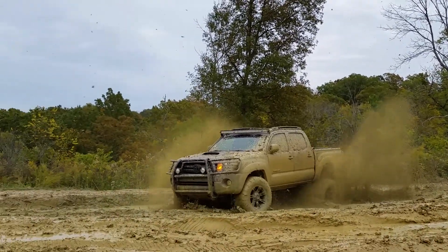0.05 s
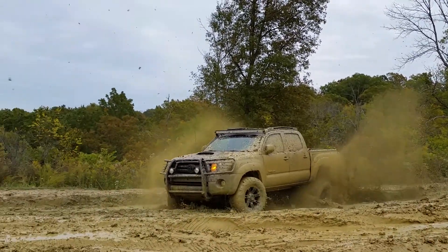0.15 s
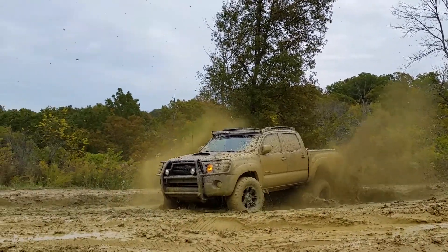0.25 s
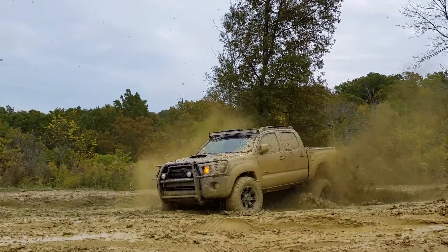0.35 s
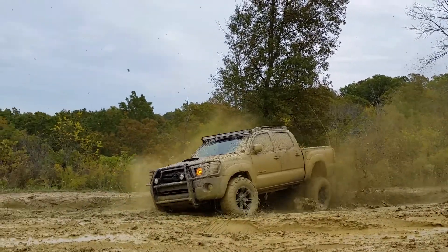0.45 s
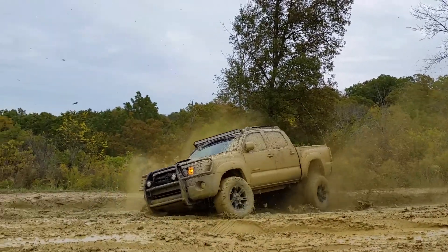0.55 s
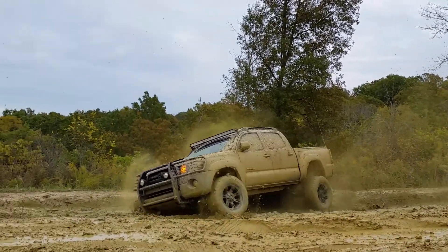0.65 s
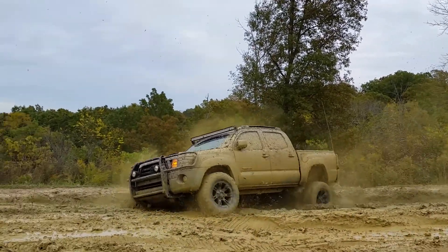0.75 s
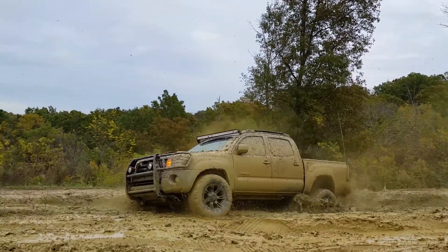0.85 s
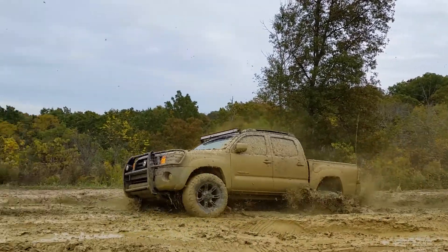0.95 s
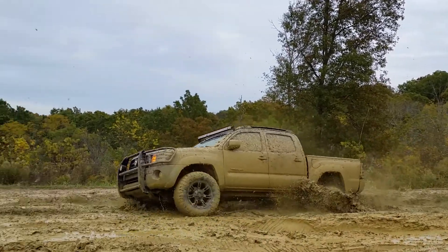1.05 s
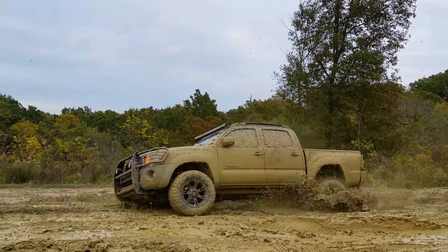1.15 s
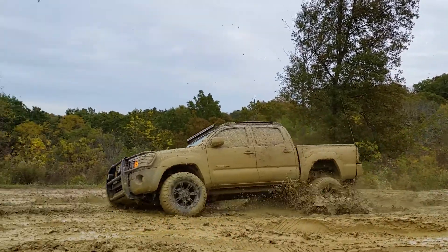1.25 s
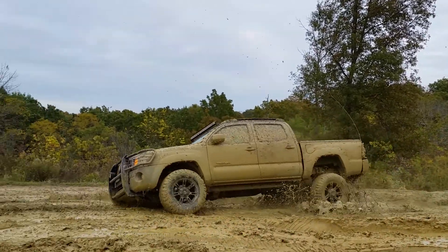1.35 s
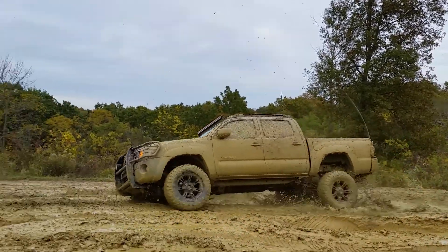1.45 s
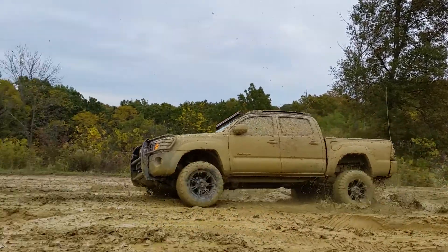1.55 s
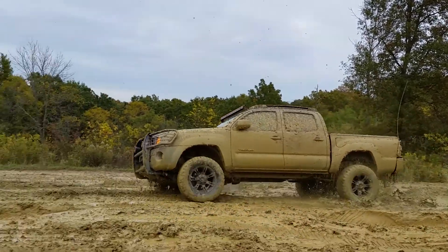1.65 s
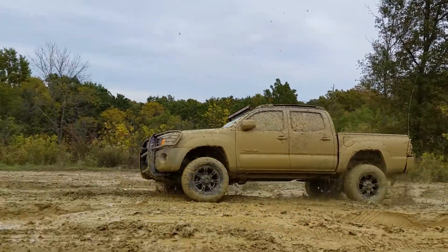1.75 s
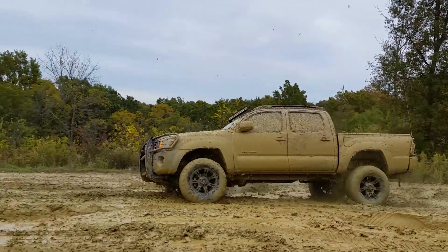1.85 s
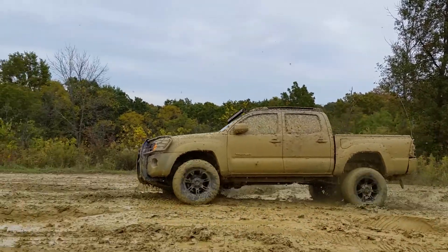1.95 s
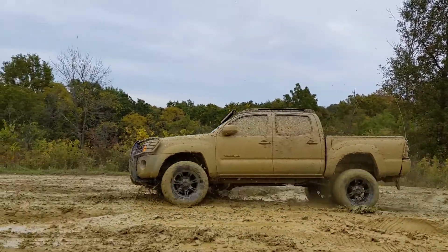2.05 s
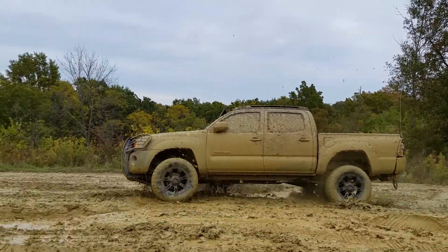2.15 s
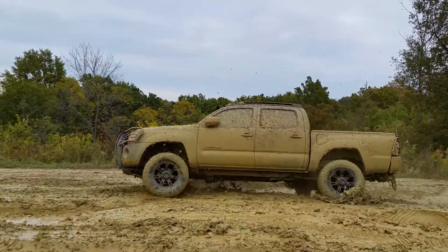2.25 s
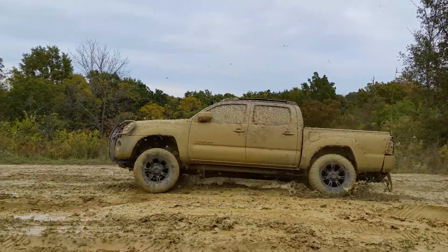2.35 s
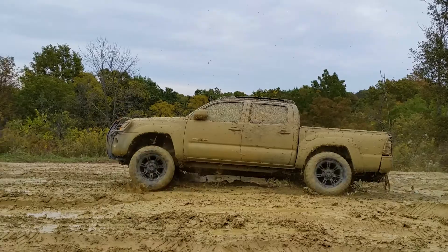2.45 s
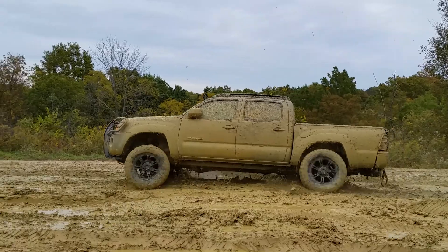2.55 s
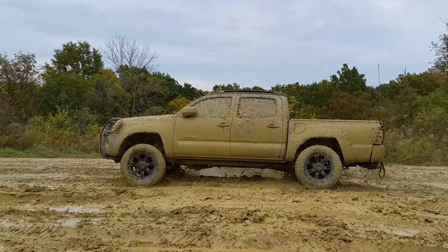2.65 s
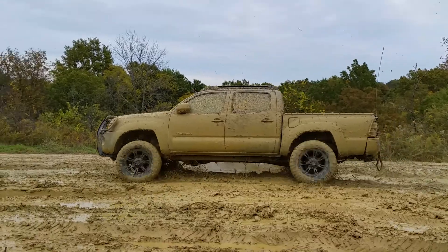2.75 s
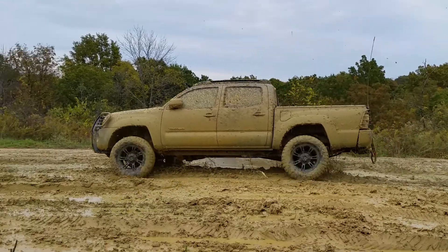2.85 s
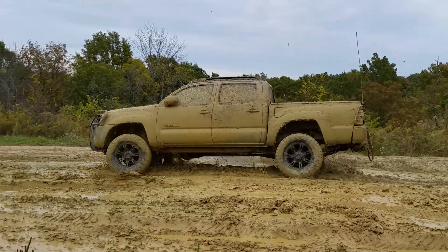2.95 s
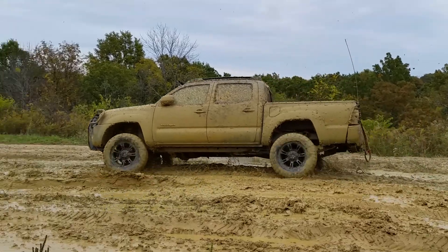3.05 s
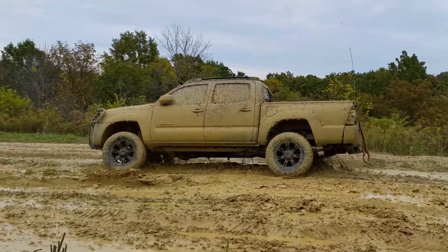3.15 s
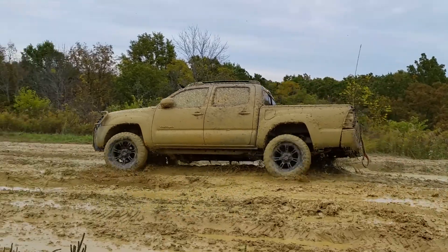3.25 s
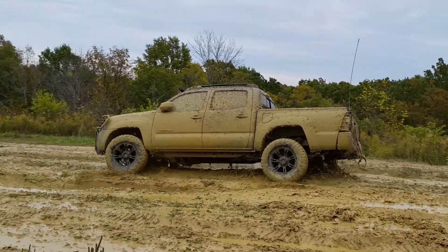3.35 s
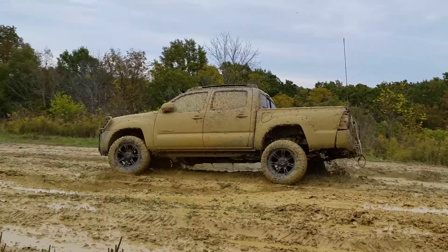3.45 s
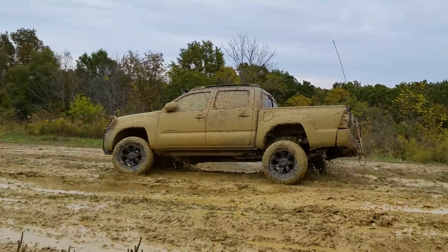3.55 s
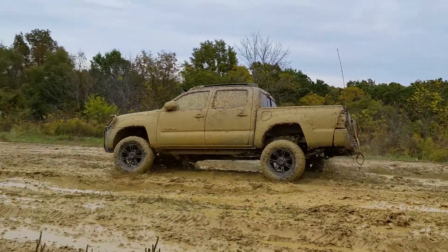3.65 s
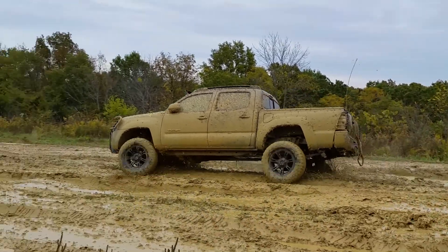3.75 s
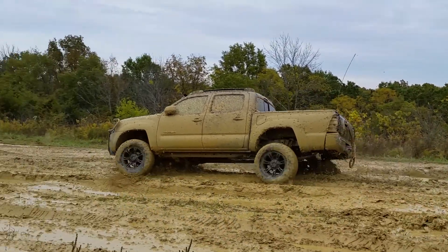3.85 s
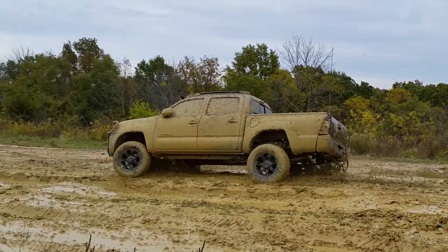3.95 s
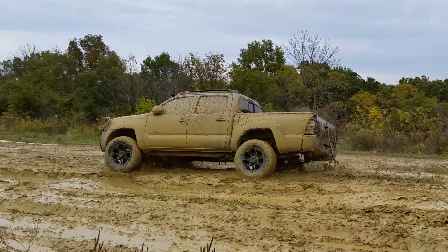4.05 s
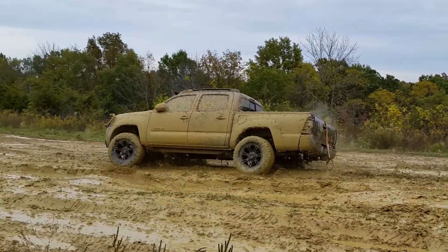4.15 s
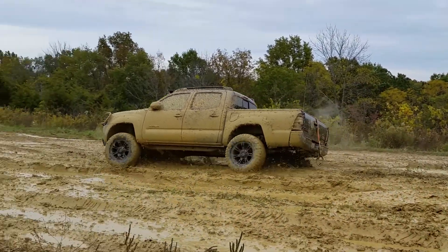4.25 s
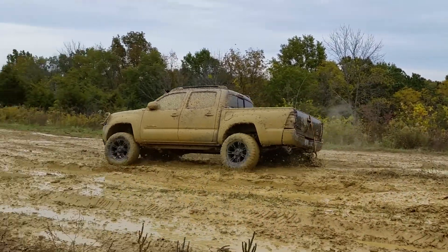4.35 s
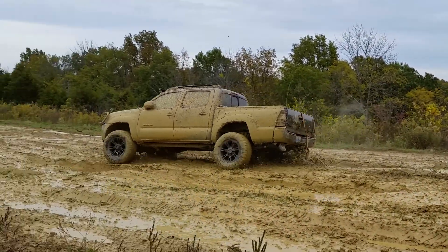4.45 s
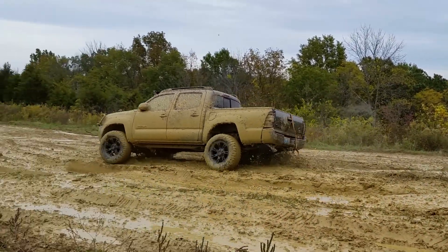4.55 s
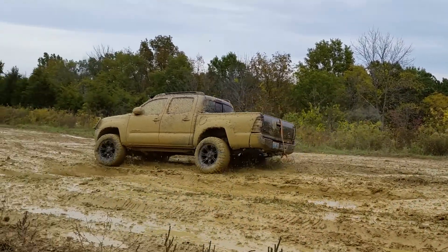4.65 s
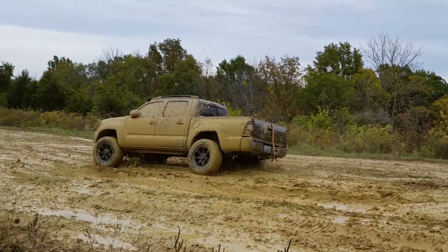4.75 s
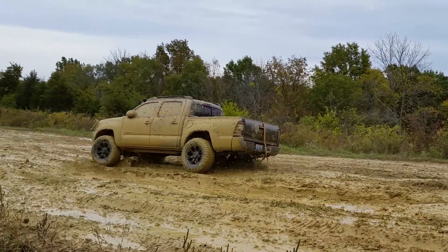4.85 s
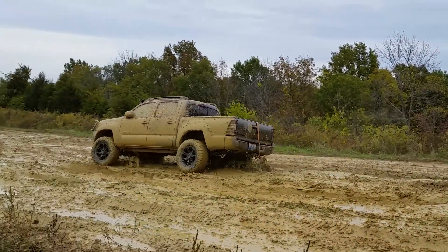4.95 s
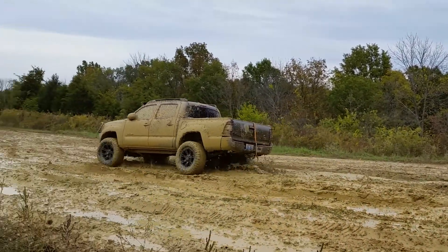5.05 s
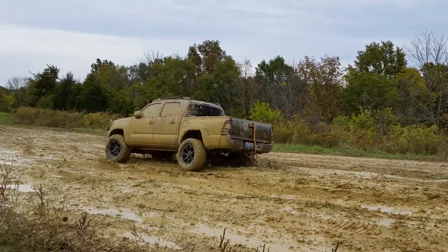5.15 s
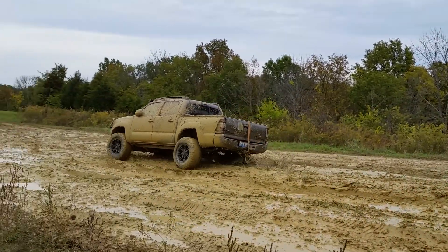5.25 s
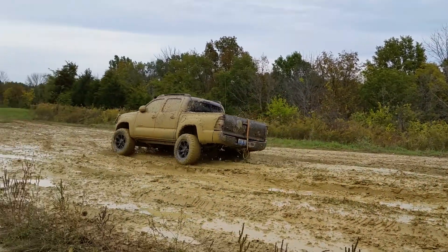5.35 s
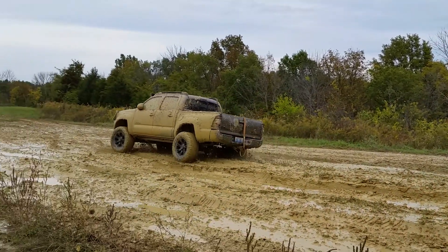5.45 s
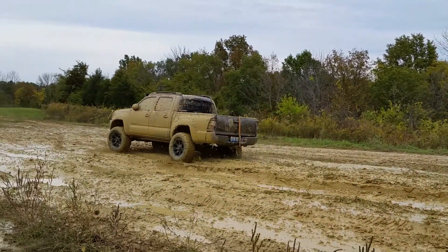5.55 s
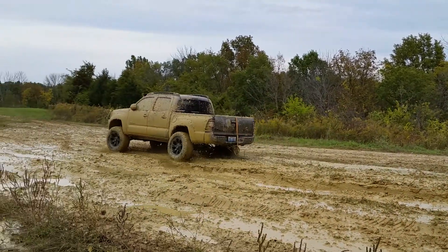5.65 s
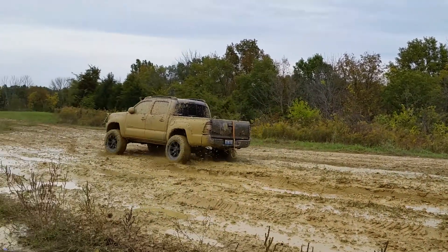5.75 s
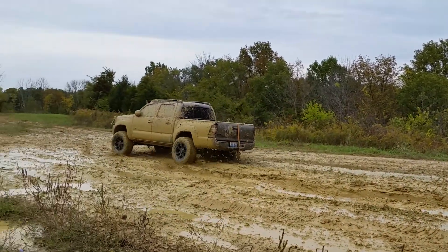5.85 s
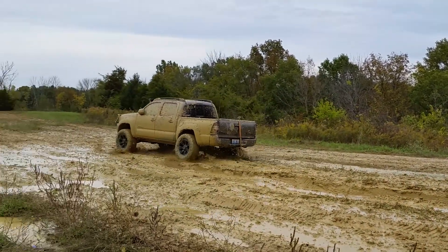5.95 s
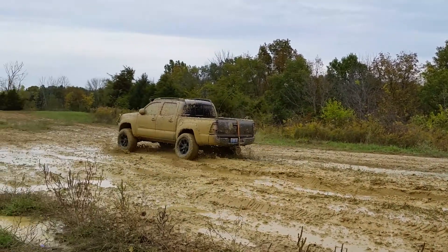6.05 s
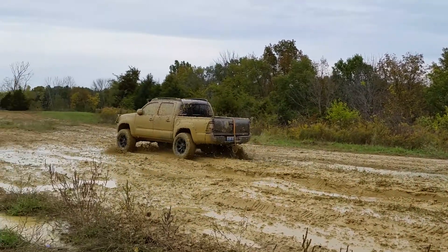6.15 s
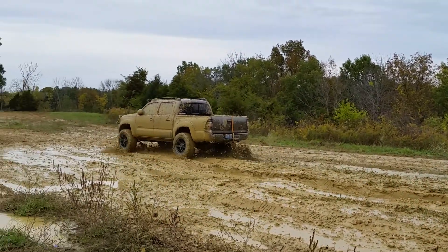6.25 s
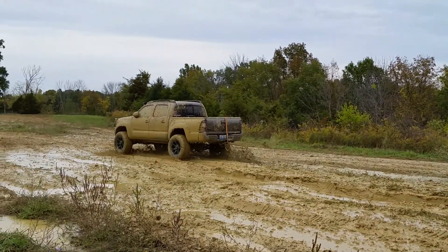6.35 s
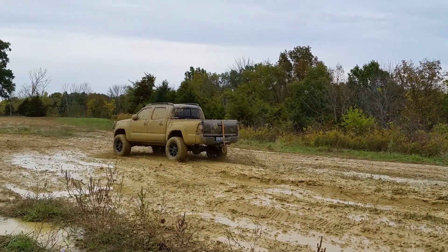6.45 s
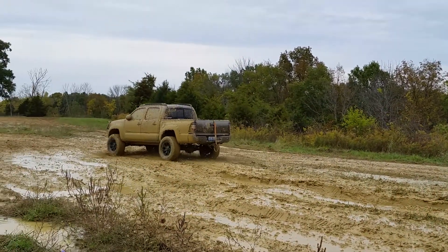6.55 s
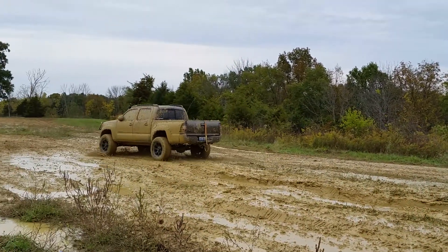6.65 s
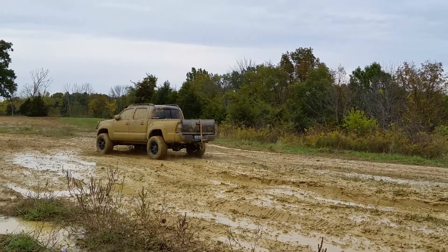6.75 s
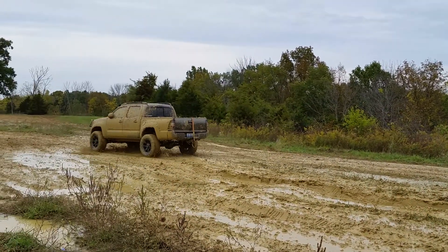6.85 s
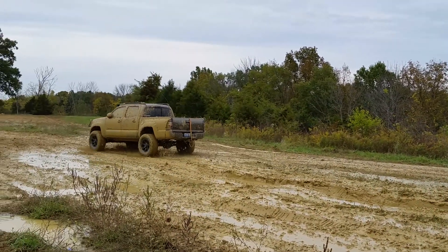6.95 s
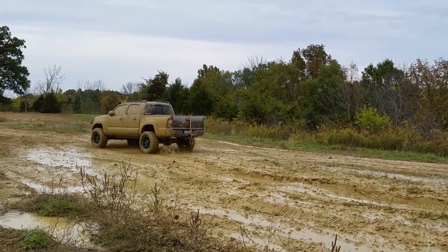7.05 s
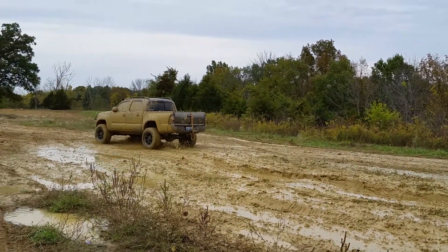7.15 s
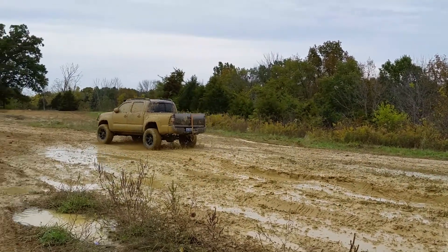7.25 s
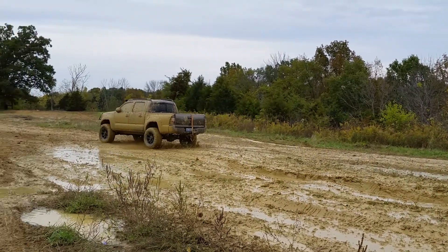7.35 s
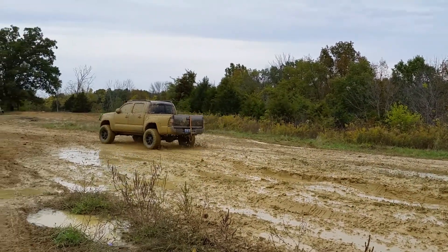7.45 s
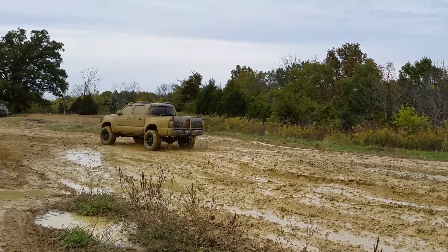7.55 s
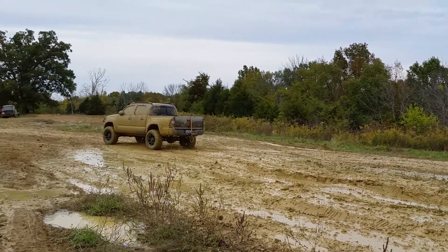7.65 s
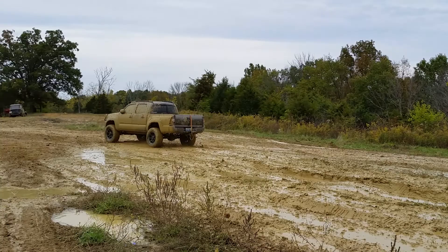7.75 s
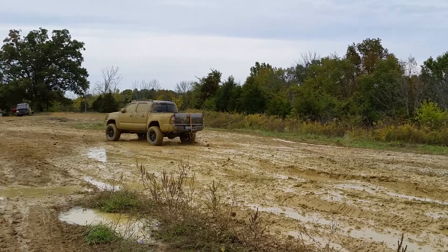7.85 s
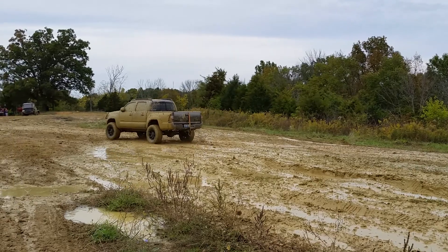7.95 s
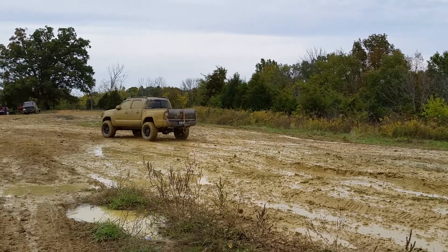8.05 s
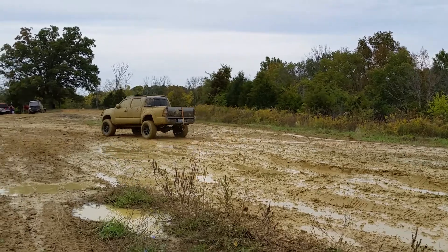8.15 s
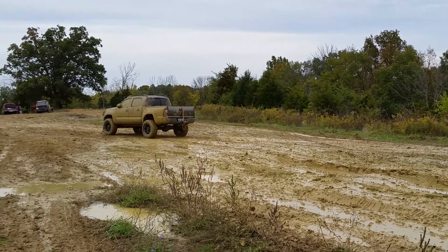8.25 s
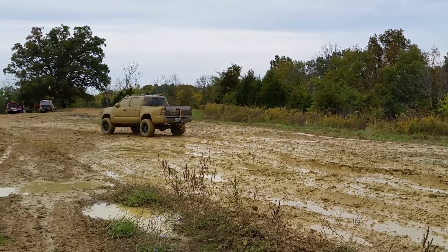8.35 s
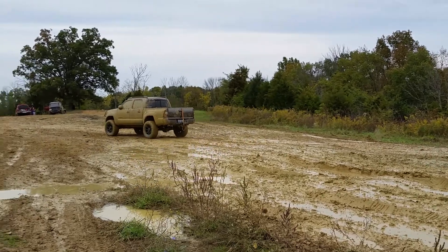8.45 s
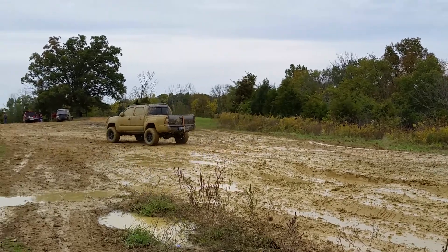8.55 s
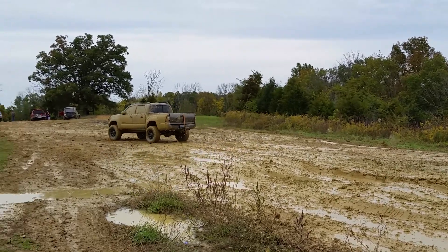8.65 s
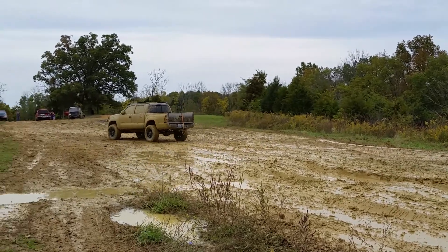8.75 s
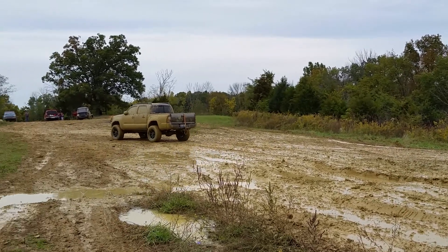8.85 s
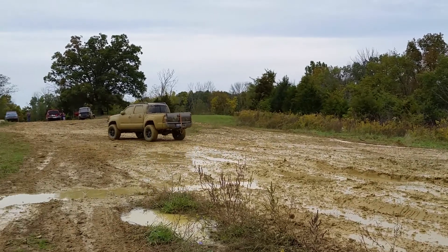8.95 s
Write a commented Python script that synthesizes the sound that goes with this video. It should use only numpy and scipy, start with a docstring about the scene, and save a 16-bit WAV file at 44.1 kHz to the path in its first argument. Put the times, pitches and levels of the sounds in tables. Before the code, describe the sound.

Muddy truck engine: ragged roar and spray bogs down, then a deep exhaust boom swells and sinks in waves, with dull chassis knocks, receding over a field.

```python
"""A burst of rough exhaust roar opens as a pickup truck spins its wheels in mud and its engine sags.
Then the wheels grip, and the boom surges and falls back as the truck drives off over a field.
The boom is a stack of sines on the engine beat. Roar, tyre and fan rush, spray hiss and rumble are
shaped noise, and chassis knocks are short cracks with a ring. Two microphone ports share the bass
but colour the treble each in its own way."""
import sys
import numpy as np
from scipy import signal
from scipy.fft import irfft
from scipy.io import wavfile
from scipy.ndimage import uniform_filter1d

SR = 44100
rng = np.random.default_rng(int(sys.argv[2]) if len(sys.argv) > 2 else 0)


def log_audio(samples):
    """Write samples as a 16-bit WAV file to the path given in sys.argv[1]."""
    # one column per channel
    frames = np.atleast_2d(samples).T
    # limit to full scale, then quantise
    limited = np.clip(frames, -1, 1)
    pcm = np.round(limited * 32767).astype(np.int16)
    wavfile.write(sys.argv[1], SR, pcm)


N = 396900

# Noise bed over time: start_s, roar_db (exhaust), rush_db (tyres and fan), hiss_db (spray)
WASH_LEVELS = [(0.0, -27.5, -36.5, -36), (0.1, -32, -35, -36), (0.37, -31, -36, -36),
               (0.68, -34.5, -38, -39), (0.77, -31, -32.5, -33.5), (0.93, -35, -30, -30.5),
               (1.04, -34.5, -35, -32.5), (1.3, -38, -36.5, -35), (1.53, -40.5, -37.5, -36.5),
               (1.75, -39, -43, -41.5), (2.18, -36, -37.5, -42), (2.51, -40.5, -40, -39),
               (2.7, -42, -37.5, -38.5), (2.93, -39.5, -46, -48.5), (3.12, -37, -43, -44.5),
               (3.3, -43, -43, -44), (3.8, -42, -41.5, -44.5), (4.46, -40.5, -40, -41.5),
               (4.59, -41.5, -38.5, -36.5), (4.89, -44.5, -38, -35), (5.1, -42, -42, -38.5),
               (5.29, -43, -38.5, -36), (5.61, -38.5, -39.5, -38.5), (5.8, -36.5, -37.5, -39),
               (6.17, -37, -36.5, -39), (6.57, -40.5, -36.5, -40), (6.92, -37.5, -37.5, -43.5),
               (7.07, -40.5, -34, -41), (7.57, -47, -38.5, -44.5), (7.69, -44, -37, -43.5),
               (7.95, -42, -36.5, -49.5), (8.42, -46, -39, -48), (9.0, -48.5, -41, -67)]
# Relative noise spectra of exhaust roar, tyre and fan rush, spray hiss, drivetrain drone: freq_hz, level_db
ROAR_SPECTRUM = [(30, -11), (60, -14), (120, 9.5), (220, 20.5), (300, -3.5), (400, 2.5), (500, 2.5),
                 (620, 7), (760, -5), (950, -7.5), (1400, -29.5)]
RUSH_SPECTRUM = [(350, -38), (700, -10.5), (950, -7), (1220, 1), (1500, -6), (1800, 0.5), (2200, -9),
                 (2500, -4), (4000, -12.5), (9000, -16)]
HISS_SPECTRUM = [(5000, -12), (7000, -3.5), (9000, 4), (10500, -7), (12000, -1.5), (14500, -6.5)]
RUMBLE_SPECTRUM = [(30, -17), (70, 9), (150, 15), (280, -2.5), (330, -34), (450, -28)]
# Distance of the truck: time_s, nearness (1 close by to 0 far down the field)
NEARNESS_CURVE = [(0, 0.84), (2.5, 0.83), (4.5, 0.82), (6.5, 0.5), (9, 0.069)]
# Likeness of the noise in the two channels: freq_hz, likeness (correlation, -1 to 1)
STEREO_LIKENESS = [(60, 1.0), (120, 1.0), (230, 0.99), (460, 0.95), (920, 0.89), (1810, 0.47), (3580, 0.08),
                   (7070, -0.23), (14000, 0.076)]
# Chassis knocks: start_s, level_db, pitch_hz (ring), crack_hz (sets the top of the crack band)
KNOCK_EVENTS = [(0.389, -22, 443, 1080), (0.764, -22, 455, 1230), (0.929, -23, 446, 1690),
                (1.985, -27, 570, 1215), (2.796, -38, 484, 1000), (3.101, -27, 449.8, 982),
                (3.9, -23.5, 590, 1240), (4.379, -24, 560, 902), (5.089, -25, 614, 1200),
                (5.901, -45, 670, 1718), (7.071, -28, 460, 1200), (7.128, -42, 496, 1910),
                (7.237, -36, 1370, 1850), (7.31, -33, 1380, 1870), (8.239, -35, 684, 1800)]

# Engine speed: time_s, beat_hz (half the pulse rate)
BEAT_CURVE = [(0.0, 46.3), (0.17, 48.8), (0.3, 50.1), (0.45, 46.3), (0.58, 42.6), (0.7, 37.6), (0.8, 31.3),
              (0.9, 24.9), (1.0, 21.2), (1.15, 19.4), (1.25, 24.6), (1.3, 24.9), (1.4, 27.5), (1.5, 34.3),
              (1.6, 42.4), (1.7, 47.5), (1.78, 50.8), (1.88, 53.8), (2.06, 58.7), (2.15, 58.9), (2.3, 57.1),
              (2.43, 50.2), (2.53, 48.9), (2.66, 44.9), (2.8, 45.2), (2.88, 44.1), (3.01, 41.1),
              (3.18, 47.1), (3.26, 46.8), (3.41, 40.6), (3.51, 37.2), (3.61, 39.7), (3.73, 41.9),
              (3.91, 44.4), (4.09, 46.2), (4.41, 41.7), (4.54, 39.8), (4.66, 34.2), (4.84, 26.2),
              (4.99, 22.9), (5.11, 23.1), (5.31, 27.7), (5.41, 30.7), (5.6, 39.8), (5.68, 40.5),
              (5.86, 41.8), (5.97, 40.6), (6.14, 35.7), (6.31, 33.9), (6.52, 36.2), (6.69, 40.4),
              (6.77, 41.3), (6.92, 39.4), (7.09, 32.4), (7.19, 28.5), (7.39, 23.4), (7.5, 22.3),
              (7.6, 24.6), (7.72, 29.1), (7.84, 31.9), (7.97, 33.1), (8.1, 32.0), (8.32, 27.6),
              (8.45, 25.3), (8.87, 24.5), (9.0, 23.7)]
# Throttle: time_s, level_db (pulse tone before the pipe)
LOAD_CURVE = [(0, -14.5), (.4, -15.5), (.66, -10.5), (.85, -16.5), (.98, -15), (1.12, -23), (1.19, -15),
              (1.252, -3.5), (1.55, -1.7), (2.1, -3), (2.5, -3.5), (3.4, -3), (3.52, -5.5), (3.65, -1.5),
              (4.5, -5), (4.699, -10.5), (4.85, -16.5), (4.98, -22), (5.12, -9), (5.3, -4.5), (5.9, -5),
              (6.25, -7.5), (6.8, -4), (7, -7), (7.2, -18.5), (7.38, -28), (7.5, -20.5), (7.62, -6),
              (7.75, -6.5), (8, -9), (8.3, -15), (8.87, -17.5), (9, -24)]
# Multiples 1, 2, 3 .. of the beat: level_db, wheelspin_change_db, boom_change_db (at full boom)
ORDER_LEVELS = [(-16.5, 4, 9.5), (0.5, 2.5, -1), (-11, -12, -7), (-8, 9.5, -4.5), (-26, -5, -2.8),
                (-17, 2, -5.5), (-32.5, -9, 10), (-22, 11, -7), (-34.5, -2, -2), (-24, 8, -4),
                (-32, -5, -3), (-30.5, -10, -10), (-36, -6, -5), (-35.5, 1.5, -8.5), (-31, 4, -9)]
# Pulses limping in threes while the wheels spin: multiple (of the beat), level_db (relative)
LIMP_LEVELS = [(8 / 3, 0.5), (10 / 3, 0), (14 / 3, -10), (16 / 3, -16)]
# Orders that sing out for a moment: middle_s, half_length_s, multiple (of the beat), level_db
SINGING_ORDERS = [(.05, 0.12, 14, -32.5), (.1, 0.092, 12, -46), (.25, 0.26, 8, -36.5),
                  (.55, 0.091, 14, -33.5), (.62, 0.1, 6, -25), (.88, 0.058, 8, -19.5),
                  (.84, 0.054, 11, -29), (0.933, .06, 7, -32), (1.367, 0.087, 6, -19.5),
                  (1.786, 0.059, 11, -41), (2.086, .15, 11, -36.5), (2.0, 0.38, 6, -42),
                  (2.19, 0.058, 8, -37.5), (2.102, 0.18, 5, -34), (2.9, .1, 6, -42), (4.1, .2, 5, -32.5),
                  (2.2, .12, 10, -44), (2.148, 0.17, 12, -43.5), (2.86, 0.056, 13, -38.5),
                  (2.95, .1, 7, -43), (3.182, 0.095, 9, -44), (3.2, 0.13, 7, -41), (4.0, 0.37, 13, -41.5),
                  (3.983, 0.36, 7, -39.5), (4.5, .12, 5, -28), (5.2, .1, 8, -29.5), (5.25, .12, 6, -27),
                  (5.7, 0.24, 6, -29), (5.8, 0.35, 5, -28), (6.4, .3, 6, -31), (6.75, 0.28, 5, -30),
                  (7.95, .15, 6, -27.5), (8.6, 0.26, 6, -36), (5.8, 0.23, 8, -38), (6.25, 0.22, 7, -36),
                  (6.8, 0.23, 8, -40), (8.7, .3, 8, -44)]
# Response of exhaust pipe and muffler: freq_hz, level_db
PIPE_RESPONSE = [(35.0, -40.5), (50.0, -29.5), (65.0, -16.0), (80.0, -5.5), (100.0, -5), (130.0, -1.35),
                 (165.0, 1), (190.0, -1.5), (220.0, -3.5), (270.0, -10.5), (320.0, -16.5), (380.0, -31),
                 (470.0, -23), (540.0, -45.5), (585.0, -16.5), (640.0, -20.5), (720.0, -23), (900.0, -25)]
# Exhaust brightness as the truck turns: time_s, tilt_db_per_octave (about 100 Hz, before coasting)
TILT_CURVE = [(0.0, 2.5), (0.8, 2), (1.3, -0.3), (2.0, -3.5), (3.0, -1.1), (4.0, -2.15), (5.0, -0.1),
              (5.8, -1.2), (6.4, -0.6), (7.0, 1.6), (7.7, -2), (9.0, 2.8)]
# Narrow dip wandering among the low orders: time_s, centre_hz
DIP_CURVE = [(1.7, 192), (2.4, 197), (2.8, 242), (3.3, 241), (4, 267), (4.35, 267), (5.5, 176), (5.85, 167),
             (6.2, 188), (6.85, 167.4), (9, 158)]

# Colour of each microphone port: freq_hz, level_db
LEFT_PORT = [(2300, 0.5), (2850, -9), (3400, -1.5), (4300, 1.5), (5000, -1.5), (5600, -18), (6200, -28),
             (7000, -10), (8300, -25), (9300, -5), (10500, 8.5), (12000, 5.5), (13500, 4.5), (14500, 1)]
RIGHT_PORT = [(300, 1.5), (1200, 1), (2300, 3), (2700, -11.5), (2870, -13), (3200, 0), (4200, 6.5),
              (6000, -0.5), (7300, -5), (8300, -24), (9000, -12), (10300, 3.5), (12000, -0.5),
              (14500, -1.5)]

FAR_RUMBLE_DB, NEAR_RUMBLE_BOOST_DB = -45, 6
FULL_BOOM_DB, LIMP_DB = -7, -32.5
GRIP_START_S, GRIP_END_S = 0.93, 1.2  # the wheels stop spinning between these times
DIP_DB, DIP_WIDTH_HZ = -7, 21.4
COAST_TILT = 0.064  # off the throttle the lowest orders fall most: dB per octave per dB less load
EDGE_HZ = 14560  # top of the heard band
FRAME, HOP = 512, 128  # short-time noise spectra, in samples


def gain_of(db):
    """Turns decibels into amplitude gain."""
    return 10 ** (np.asarray(db) / 20)


def evened(x):
    """Scales a signal to rms 1."""
    return x / np.sqrt(np.mean(x ** 2) + 1e-20)


def read(points, hz):
    """Reads a spectrum joined by straight lines on a log-frequency axis."""
    f, value = np.transpose(points)
    return np.interp(np.log(hz + 1), np.log(f + 1), value)


def played(table, t):
    """Reads all columns of a curve table at times t; column 0 is time."""
    columns = np.transpose(table)
    return np.array([np.interp(t, columns[0], column) for column in columns])


def drift(seconds):
    """Makes a smooth random wander of rms 1 by averaging noise twice over a span."""
    span = max(round(seconds * SR), 2)
    once = uniform_filter1d(rng.standard_normal(N), span)
    return evened(uniform_filter1d(once, span))


def engine_turns():
    """Sums the beat rate into a running phase, so pitch glides without a break."""
    beat = played(BEAT_CURVE, np.arange(N) / SR)[1]
    return beat, 2 * np.pi * np.cumsum(beat) / SR


def noise_power(hz, frame_s, near):
    """Adds the power of roar, rush, hiss and rumble, each scaled by its shape within its main band."""
    _, roar_db, rush_db, hiss_db = played(WASH_LEVELS, frame_s)
    rumble_db = FAR_RUMBLE_DB + NEAR_RUMBLE_BOOST_DB * near
    layers = [(ROAR_SPECTRUM, 400, 850, roar_db), (RUSH_SPECTRUM, 1000, 5000, rush_db),
              (HISS_SPECTRUM, 9000, 14500, hiss_db), (RUMBLE_SPECTRUM, 30, 450, rumble_db)]
    power = 0
    for spectrum, low_hz, high_hz, level_db in layers:
        shape = gain_of(2 * read(spectrum, hz))  # doubled dB: power, not amplitude
        band = (hz > low_hz) & (hz < high_hz)
        power = power + np.outer(shape / shape[band].sum(), gain_of(2 * level_db))
    return power


def spray_fizz_db(hz, near):
    """Lifts the treble of close spray and adds random splats around 1800 Hz as clods land."""
    frames = len(near)
    fizz_db = 8 * np.outer(np.exp(-((hz - 12100) / 900) ** 2), near - .5)
    fizz_db += 6 * np.outer(np.exp(-((hz - 6500) / 1500) ** 2), near - .5)
    clods = rng.exponential(1, frames) * (rng.random(frames) < .1)
    splats = uniform_filter1d(clods, 4)
    return fizz_db + 4 * np.outer(np.exp(-(np.log(hz / 1800 + 1e-3) / 0.68) ** 2), splats)


def wash(turns):
    """Paints the noise bed from random short-time spectra with drifting patches; pulses throb in it."""
    frames, hz = N // HOP + 5, np.fft.rfftfreq(FRAME, 1 / SR)
    frame_s = np.arange(frames) * HOP / SR
    near = played(NEARNESS_CURVE, frame_s)[1]
    a, b, c, d, patches = rng.standard_normal((frames, len(hz), 5)).T
    patches = uniform_filter1d(patches, 20, 1)  # smooth over time
    patches = evened(uniform_filter1d(patches, 6, 0))  # and over frequency
    flicker = evened(uniform_filter1d(rng.standard_normal(frames), 14))

    # the right channel shares part of the left noise
    same = np.clip(read(STEREO_LIKENESS, hz), -1, 1)[:, None]
    left, other = a + 1j * b, c + 1j * d
    spectra = np.array([left, same * left + np.sqrt(1 - same ** 2) * other])
    colour_db = spray_fizz_db(hz, near) + 1.33 * patches + 0.64 * flicker - 0.5
    spectra *= np.sqrt(noise_power(hz, frame_s, near)) * gain_of(colour_db)
    noise = signal.istft(spectra, nperseg=FRAME, noverlap=FRAME - HOP)[1][:, :N]
    return noise * (1 + 0.06 * np.cos(2 * turns))  # two pulses per beat


def knocks():
    """Strikes dull chassis blows: a short crack of band noise and a brief ring die away together."""
    length = 2000  # samples
    out, t = np.zeros(N + length), np.arange(length) / SR
    noises = rng.standard_normal((len(KNOCK_EVENTS), length))
    for (start_s, level_db, pitch_hz, crack_hz), noise in zip(KNOCK_EVENTS, noises):
        band = signal.butter(N=2, Wn=[350, 1.07 * crack_hz], btype="band", fs=SR)
        crack = evened(signal.lfilter(*band, noise))
        ring = np.sin(2 * np.pi * pitch_hz * t)
        blow = 0.6 * crack + 0.6 * ring + 0.14 * noise
        fade = gain_of(level_db - 60 * t / .07)  # falls 60 dB in 70 ms
        attack = np.minimum(t / .003, 1)
        out[round(start_s * SR):][:length] += fade * blow * attack
    return out[:N]


def order_levels(beat):
    """Sets each order's level from throttle, pipe and tilt, with wheelspin limp and singing orders."""
    t = np.arange(N) / SR
    load_db, tilt, dip_hz = (played(table, t)[1] for table in (LOAD_CURVE, TILT_CURVE, DIP_CURVE))
    spin = np.interp(t, (GRIP_START_S, GRIP_END_S), (1, 0))

    def piped(hz):
        """Passes the pulse tone through the pipe; the dip opens once the wheels grip."""
        tilt_db = (tilt - COAST_TILT * load_db) * np.log2(hz / 100)
        notch_db = DIP_DB * (1 - spin) * np.exp(-((hz - dip_hz) / DIP_WIDTH_HZ) ** 2)
        return load_db + read(PIPE_RESPONSE, hz) + tilt_db + notch_db

    boom = gain_of(piped(2 * beat) - FULL_BOOM_DB)  # 1 at full boom
    tones = []
    for k, (db, spin_db, boom_db) in enumerate(ORDER_LEVELS, start=1):
        tones.append((k, piped(k * beat) + db + spin_db * spin + boom_db * boom))
    for k, db in LIMP_LEVELS:
        tones.append((k, LIMP_DB + db - 40 * (1 - spin)))
    for middle_s, half_s, k, db in SINGING_ORDERS:
        order, steady_db = tones[round(k) - 1]
        swell_db = db - 6 * ((t - middle_s) / half_s) ** 2  # 6 dB down at the half length
        tones[order - 1] = order, np.maximum(steady_db, swell_db)
    return tones


def exhaust(beat, turns):
    """Sums orders of the beat; each lags more as its pitch rises past about 70 Hz, and wavers as no two firings
    are alike."""
    slip = .006 * drift(.015)  # firings come a little early or late, in radians of the beat
    out = np.zeros(N)
    for k, db in order_levels(beat):
        rising_lag = 2 * np.arctan((k * beat - 70) / 40)
        lag = rising_lag - .9 * (k % 2)  # every second pulse comes early
        waver = 1 + .014 * min(k, 8) * drift(.02)
        out -= np.sqrt(2) * gain_of(db) * waver * np.cos(k * (turns + slip) - lag)
    return out


def scene():
    """Mixes the truck: boom and knocks near the middle, noise spread wide."""
    beat, turns = engine_turns()
    boom = exhaust(beat, turns) * gain_of([[-.2], [-.7]])  # left, right dB
    return wash(turns) + knocks() + boom


def record(dry):
    """Colours each port by its own filter, rounds off the highest peaks, then limits the band."""
    hz = np.fft.rfftfreq(1024, 1 / SR)
    responses = gain_of([read(LEFT_PORT, hz), read(RIGHT_PORT, hz)])
    ports = np.roll(irfft(responses), 512, 1) * np.hanning(1025)[:-1]
    heard = signal.oaconvolve(dry, ports, axes=1)[:, 512:512 + N]
    heard = heard / (1 + abs(heard / .99) ** 6) ** (1 / 6)  # the input stage rounds the highest peaks
    low_pass = signal.firwin(1023, EDGE_HZ, window=("kaiser", 9), fs=SR)
    return signal.oaconvolve(heard, low_pass[None], "same")


dry = scene()
out = record(dry)
log_audio(out)
```